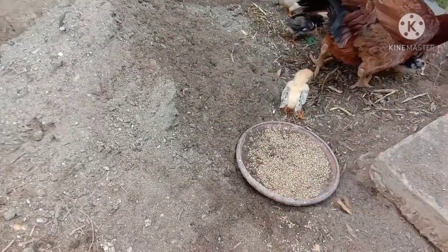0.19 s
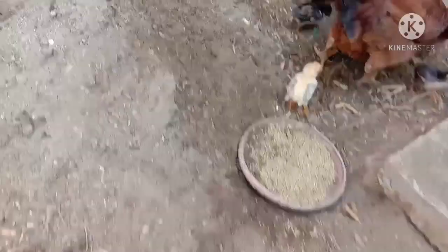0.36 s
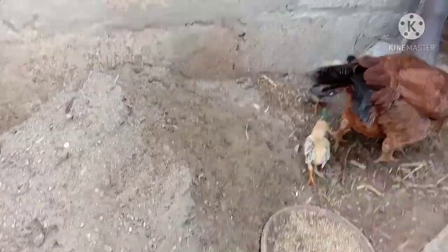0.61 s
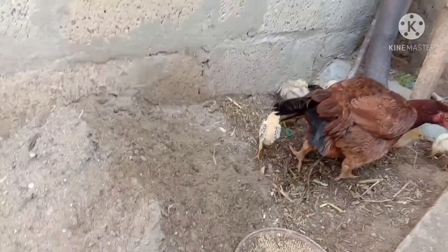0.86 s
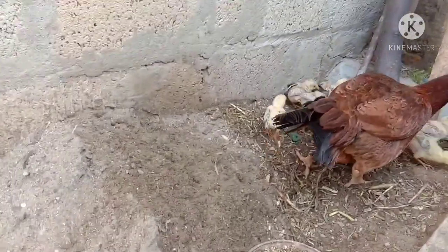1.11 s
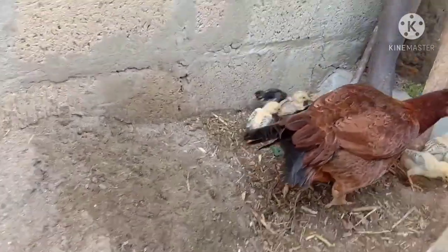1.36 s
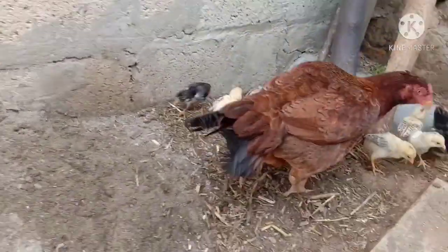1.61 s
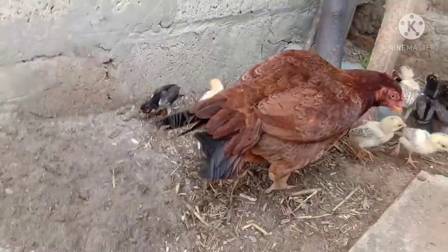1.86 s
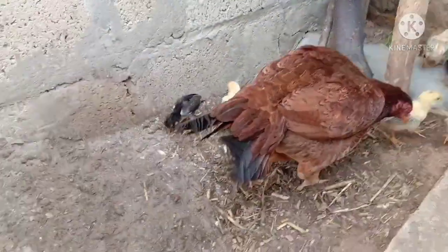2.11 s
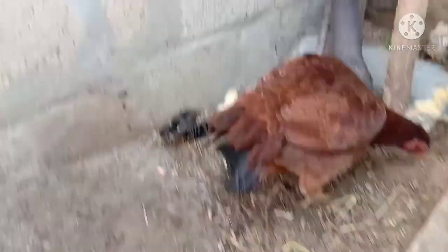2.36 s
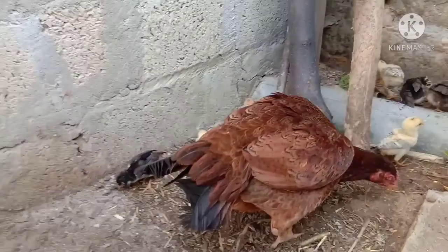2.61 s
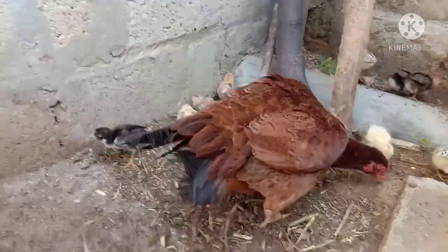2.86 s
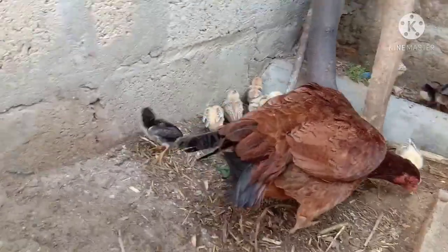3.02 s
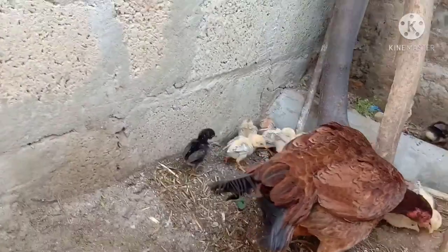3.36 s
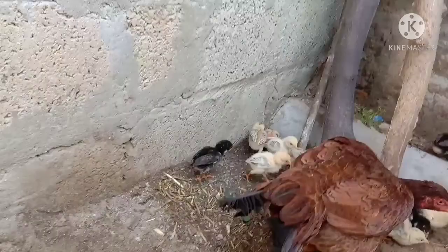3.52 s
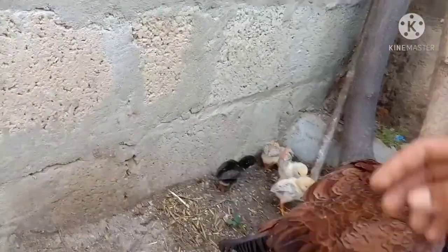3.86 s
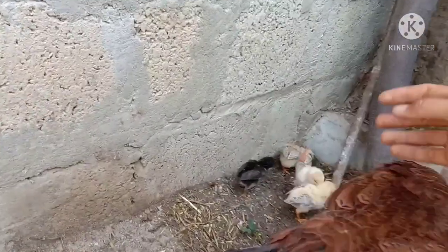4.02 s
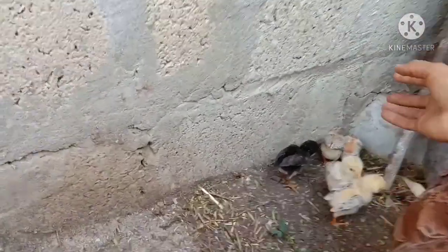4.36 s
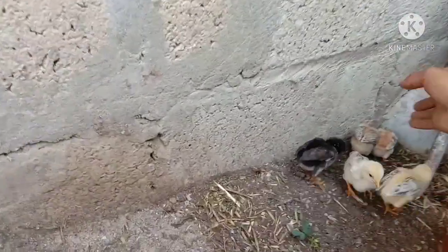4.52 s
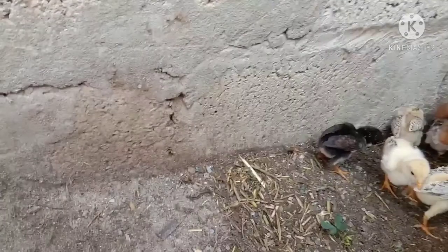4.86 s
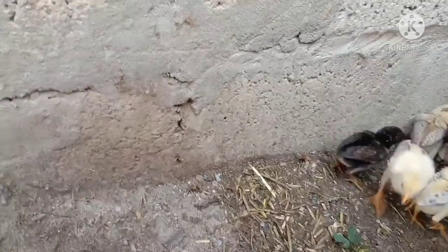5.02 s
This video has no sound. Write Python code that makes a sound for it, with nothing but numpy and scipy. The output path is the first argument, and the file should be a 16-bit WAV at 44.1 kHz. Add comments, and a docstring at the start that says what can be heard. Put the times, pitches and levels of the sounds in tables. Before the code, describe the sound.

Chicks keep up fast, high peeping over gritty footsteps and a few brief clucks, and a hen squawks once near the end.

```python
"""Chicks and a hen in a dirt yard

Chicks peep beside a block wall, each peep a short whistle that arches or slides in pitch. The hen
gives one squawk: two membranes sound at once while her fluttering throat makes a trill.
Feet scuff the grit, with short raspy clucks, low thuds and sharp ticks between. Far off, fowl call
and traffic rumbles. The wall and ground add a quick echo, and a phone close by picks it all up."""
import sys
import numpy as np
from scipy import signal
from scipy.fft import rfft, irfft
from scipy.io import wavfile
from scipy.ndimage import uniform_filter1d

SR = 44100
rng = np.random.default_rng(int(sys.argv[2]) if len(sys.argv) > 2 else 0)


def master_out(mix):
    """Clip the mix to full scale and print it as 16-bit PCM to the path in sys.argv[1]."""
    frames = np.transpose(np.atleast_2d(mix))
    ceiling = np.clip(frames, -1, 1)
    pcm = np.round(ceiling * 32767).astype(np.int16)
    wavfile.write(sys.argv[1], SR, pcm)


N = 228168

# Tone of the traffic and air: f/Hz, relative level/dB per Hz
YARD_SPECTRUM = [(30, -26), (110, -3.5), (300, -16), (700, -19), (2000, -21), (11000, -22)]
# Distant calls: start t/s, length/s, pitch f/Hz, relative level/dB of harmonics 2, 3 and 4
FOWL_CALLS = [(0.219, 0.32, 423, -59.5, -61.5, -62.5), (3.16, 0.37, 394, -89, -77, -57.5)]
# Feet on the ground: loudest t/s, rise/s, drag/s, fine grit level/dB, sole level/dB
FOOTSTEPS = [(.55, 0.0315, 0.095, -51, -69.5), (.89, 0.17, 0.043, -45, -64.5),
             (0.987, 0.013, 0.0029, -36, -49.5), (1.131, 0.222, .64, -38, -65),
             (2.219, 0.049, 0.021, -34, -46.5), (2.311, 0.069, 0.032, -43.5, -46),
             (2.441, 0.0136, 0.044, -59, -59.5), (3.127, 0.069, 0.08, -60, -60),
             (4.49, 0.28, 0.76, -48, -74.5)]
# Raspy clucks, low thuds, scuffs and sharp ticks: t/s, level/dB, rough pitch f/Hz, cycles to the peak
SHORT_SOUNDS = [(0.984, -49, 251, 1.72), (0.985, -44, 1300, 11), (1.001, -53, 73.5, 0.79),
                (1.611, -43, 837.3, 9.5), (2.3, -31.5, 1187, 15.6), (2.432, -38.5, 261.5, 0.97),
                (3.094, -31, 1113, 3), (3.149, -33.5, 978, 13.2), (3.174, -38.5, 1790, 5.9),
                (4.021, -36.5, 755, 3.8), (3.135, -35, 9600, 3.6), (4.976, -34, 1927, 1)]
# The hen's two voices: t/s, upper f/Hz, its relative level/dB, lower f/Hz, its relative level/dB
HEN_VOICES = [(4.515, 1650, -54.5, 1400, -85), (4.585, 1830, -21, 1400, -39), (4.6, 1855, -39, 1413, -9.5),
              (4.625, 1808, -30, 1391, -37), (4.655, 1900, -27.5, 1506, -23.5),
              (4.69, 1530, -21.5, 1330, -20.5), (4.74, 1445, -24.5, 1211, -19),
              (4.83, 1368, -29, 1205, -19), (4.875, 1309, -23, 1045, -37), (4.89, 1290, -49, 910, -33),
              (4.925, 1177, -57, 840, -106.5)]
# Nearest chicks: start t/s, length/s, top f/Hz, fall to the end/Hz, top's share of length, level/dB
# A share below 0 means the peep only slides down; a negative fall makes it scoop up.
NEAR_PEEPS = [(0.041, 0.039, 4130, 1172, -0.31, -39), (0.118, 0.057, 4180, 1000, -0.19, -42),
              (0.218, 0.041, 4025, 313, -0.05, -34), (0.219, 0.047, 2539, 85, -0.24, -39.5),
              (0.37, 0.048, 4400, 1091, 0.33, -45), (0.422, 0.051, 4180, 1114, 0.5, -40),
              (0.509, 0.07, 4236, 700, -0.021, -43), (0.618, 0.0647, 3560, 568, 0.065, -39.5),
              (0.648, 0.036, 4700, 309, 0.61, -41.5), (0.741, 0.06, 3765, 498, 0.6, -40.5),
              (0.811, 0.055, 4330, 1006, 0.31, -38.5), (0.867, 0.052, 4010, 1053, -0.36, -36),
              (0.916, 0.025, 4420, 298, 0.45, -40.5), (1.023, 0.051, 3650, 948, 0.25, -43),
              (1.107, 0.065, 3924, 699, 0.21, -40.5), (1.167, 0.051, 4140, 997, 0.127, -38.5),
              (1.221, 0.044, 4401, 895, 0.26, -34), (1.313, 0.062, 4343, 1310, 0.12, -36),
              (1.386, 0.077, 4434, 1400, 0.12, -38.5), (1.443, 0.04, 4240, 1200, 0.42, -37),
              (1.503, 0.19, 5076, 600, -0.046, -41), (1.526, 0.042, 3860, 400, 0.45, -34),
              (1.63, 0.048, 3870, 1298, 0.21, -37.5), (1.72, 0.065, 4718, 2104, 0.31, -37.5),
              (1.799, 0.055, 4310, 1193, -0.47, -35.5), (1.856, 0.055, 3870, 898, 0.37, -36),
              (1.92, 0.066, 4610, 1592, -0.012, -35.5), (2.032, 0.04, 4350, 899, 0.2, -33),
              (2.12, 0.066, 3760, 801, 0.545, -38), (2.163, 0.053, 4630, 1303, 0.557, -36.5),
              (2.308, 0.065, 4850, 896, 0.44, -39), (2.412, 0.029, 4040, 1192, -0.42, -36.5),
              (2.454, 0.04, 4260, 1300, 0.24, -42.5), (2.503, 0.054, 4250, 1600, 0.13, -37.5),
              (2.537, 0.05, 4430, 498, 0.58, -39.5), (2.624, 0.069, 4200, 1295, 0.32, -38.5),
              (2.64, 0.07, 5014, 452, 0.44, -41.5), (2.705, 0.077, 2740, -1700, 0.57, -40.5),
              (2.815, 0.039, 3980, 794, -0.15, -40), (2.802, 0.042, 2558, -250, 0.72, -39),
              (2.914, 0.046, 4120, 706, 0.53, -34.5), (2.948, 0.06, 4350, 1000, -0.47, -38),
              (3.085, 0.033, 4060, 903, 0.34, -38), (3.132, 0.074, 5070, 1203, 0.5, -46),
              (3.251, 0.038, 4500, 1794, -0.19, -37.5), (3.32, 0.046, 3620, 593, -0.37, -38),
              (3.326, 0.037, 4160, 504, 0.35, -38), (3.406, 0.056, 3970, 1007, 0.44, -33),
              (3.444, 0.036, 4160, 1597, -0.15, -37), (3.452, 0.032, 3860, 407, 0.11, -47),
              (3.514, 0.029, 3775, 204, 0.67, -33), (3.515, 0.038, 4396, 1703, 0.64, -37),
              (3.614, 0.038, 4000, 499, 0.64, -35), (3.697, 0.051, 4320, 1450, 0.18, -42),
              (3.711, 0.063, 4950, 520, 0.46, -39), (3.764, 0.042, 4155, 486, 0.043, -30),
              (3.865, 0.067, 4550, 897, -0.34, -35), (3.939, 0.069, 4860, 1736, -0.74, -35.5),
              (4.013, 0.053, 3990, 573, -0.63, -36), (4.029, 0.062, 4280, 1056, 0.3, -34),
              (4.123, 0.05, 4130, 1195, 0.58, -32), (4.197, 0.033, 4200, 1607, 0.16, -35.5),
              (4.249, 0.038, 4065, 523, 0.6, -32.5), (4.314, 0.032, 4020, 129, 0.48, -31.5),
              (4.372, 0.034, 3880, 507, -0.043, -32), (4.41, 0.025, 4020, 894, -0.3, -28.5),
              (4.509, 0.043, 4410, 1006, -0.35, -31.5), (4.53, 0.032, 3690, 622, 0.59, -32),
              (4.803, 0.061, 4360, 1297.5, 0.25, -34.5), (4.902, 0.045, 3950, 895, 0.057, -32.5),
              (4.922, 0.052, 4551, 1296, -0.7, -26), (5.005, 0.018, 4500, 600, 0.37, -32),
              (5.03, 0.03, 2964, 898.5, -0.19, -35), (5.036, 0.062, 3780, 1702, 0.23, -36.5),
              (5.043, 0.036, 4286, 1301, 0.35, -24.5), (5.048, 0.044, 4890, 304, 0.4, -37),
              (5.14, 0.039, 4140, 801.5, -0.64, -24)]
# One chick's three quick arches: start t/s, spacing/s, top f/Hz, fall/Hz, level/dB
CHICK_WARBLE = (5.103, 0.0205, 5130, 600, -35)

FLOCK_TOP_HZ, FLOCK_SPREAD_HZ, FLOCK_END_HZ, FLOCK_PEEP_S = 3998, 330, 2931, 0.059  # farther chicks


def undb(db):
    """Turn decibels into a gain."""
    return 10 ** (np.asarray(db) / 20)


def band(x, lo_hz, hi_hz):
    """Keep one band of frequencies, scaled to a typical size (rms) of 1."""
    y = signal.sosfilt(signal.butter(2, [lo_hz, hi_hz], "bandpass", fs=SR, output="sos"), x)
    return y / np.std(y)


def colour(x, points):
    """Shape the tone with a curve through (f/Hz, level/dB) points."""
    hz, db = np.transpose(points)
    f = np.maximum(np.arange(N // 2 + 1) * SR / N, 1)
    return irfft(rfft(x) * undb(np.interp(np.log(f), np.log(hz), db)), N)


def wander(per_s):
    """A smooth random wobble of typical size 1, with per_s new values a second."""
    hold = int(SR / per_s)
    stairs = np.repeat(rng.standard_normal(N // hold + 1), hold)
    y = uniform_filter1d(uniform_filter1d(stairs, hold), hold)[:N]
    return y / np.std(y)


def add(out, start_s, x):
    """Mix x into out from start_s on."""
    i = int(np.clip(start_s * SR, 0, N - 1))
    out[i:i + len(x)] += x[:N - i]


def traffic_and_air(level_db=-63.5):
    """Distant traffic rumble and air: half-octave bands of noise, each flickering on its own."""
    out = np.zeros(N)
    freqs, levels = np.transpose(YARD_SPECTRUM)
    for hz in 30 * 2 ** np.arange(0, 8.6, .5):
        db = np.interp(np.log(hz), np.log(freqs), levels) + 10 * np.log10(hz) + 3 * wander(4.75)
        out += undb(db) * band(rng.standard_normal(N), hz * .84, hz * 1.19)
    return out / np.std(out) * undb(level_db)


def far_fowl():
    """Faint drawn-out calls, blurred by distance into narrow bands of noise."""
    out = np.zeros(N)
    for start, length, hz, *levels in FOWL_CALLS:
        progress = np.arange(int(length * SR)) / (length * SR)
        for k, db in enumerate(levels, 2):
            blur = band(rng.standard_normal(len(progress)), k * hz * .95, k * hz * 1.05)
            add(out, start, undb(db - 3) * np.sin(np.pi * progress) ** .5 * blur)
    return out


def grit(scatter_db, share):
    """Many small grains: noise in which a share of the samples are clicks of very mixed size."""
    noise = rng.standard_normal(N)
    is_click = rng.random(N) < share
    return noise * (1 + is_click * undb(scatter_db * np.minimum(rng.exponential(size=N), 3)))


def foot_pressure(levels, rise_db=14.5, sag_db_per_s=18, lift_s=0.053):
    """How hard the feet press: each step swells, sags while dragged and lifts off."""
    out, t = np.zeros(N), np.arange(N) / SR
    for (peak, rise, drag, *_), db in zip(FOOTSTEPS, levels):
        lift, sag = peak + drag, -sag_db_per_s * drag
        times = [peak - 2 * rise, peak - rise, peak, lift, lift + lift_s, lift + 2 * lift_s]
        out += undb(db + np.interp(t, times, [-60, -rise_db, 0, sag, sag - rise_db, -60]))
    return out


def feet():
    """Fine grit hisses high; a dragged sole grinds lower, and broader the harder it presses."""
    *_, grit_db, sole_db = np.transpose(FOOTSTEPS)
    fine = colour(grit(4.9, 0.056), [(1200, -47.5), (3000, -5.5), (5000, 5), (15000, -3)])
    coarse = grit(3.5, 0.027)
    broad = colour(coarse, [(250, -12.5), (900, 4), (2500, 8.5), (7000, 2.5), (12000, -54)])
    drag = foot_pressure(sole_db) * undb(2.2 * wander(90))
    hiss = fine / np.std(fine) * foot_pressure(grit_db) * undb(2.14 * wander(40.29))
    grind = band(coarse, 1000, 2286) * drag
    scrape = broad / np.std(broad) * undb(27.5) * drag ** 1.346
    return hiss + grind + scrape


def clucks_thuds_and_ticks():
    """Each cluck, thud, scuff or tick is a brief raspy tone that swells, sinks in pitch and dies."""
    out, t = np.zeros(N), np.arange(int(.15 * SR)) / SR
    for start, db, hz, cycles in SHORT_SOUNDS:
        age = t * hz / cycles  # 1 at the peak
        swell = (age * np.exp(1 - age)) ** 2
        ring = np.sin(2 * np.pi * np.cumsum(hz * (0.9 + 0.22 * np.exp(-age))) / SR)
        rasp = 1 + 1.65 * uniform_filter1d(rng.standard_normal(len(t)), size=40)
        add(out, start, undb(db) * swell * ring * rasp)
    return out


def wall_echo(x):
    """The wall and ground throw back a quick cloud of echoes with a faint longer tail."""
    t = np.arange(int(.3 * SR)) / SR
    fade = np.exp(-t / 0.0054) + 0.055 * np.exp(-t / 0.027)
    echo = rng.standard_normal(len(t)) * (t > .002) * fade
    return signal.fftconvolve(x, echo / np.sqrt(np.sum(echo ** 2)))[:N]


def peep(length, top_hz, fall_hz, top_at, db, octave_db, breath_db):
    """An arching whistle with a weaker octave; unsteady breath shakes its pitch and level."""
    attack_s, max_climb_hz, shake_hz_per_db = 0.0044, 1100, 18
    n = int(length * SR)
    progress = np.arange(n) / (length * SR)
    drop_hz = fall_hz * ((progress - top_at) / (1 - top_at)) ** 2
    drop_hz = np.where(progress < top_at, max_climb_hz * np.tanh(drop_hz / max_climb_hz), drop_hz)
    hz = top_hz - drop_hz + shake_hz_per_db * breath_db[n:2 * n]
    phase = 2 * np.pi * np.cumsum(hz) / SR
    swell = np.tanh(progress * length / attack_s) ** 2 * (1 - progress ** 12.8) ** 0.5
    return swell * undb(db + breath_db[:n]) * (np.sin(phase) + undb(octave_db) * np.sin(2 * phase))


def hidden_chicks(peeps_per_s=45, alarm_s=3.78):
    """Steady twitter; from alarm_s on, as a hand comes near, it is louder and wider in pitch."""
    out, steady_breath = np.zeros(N), np.zeros(N // 10)
    for k, (lag, pitch, loud) in enumerate(rng.standard_normal((int(peeps_per_s * N / SR), 3))):
        start = (k + lag) / peeps_per_s
        spread_hz, db = (850, -41) if start > alarm_s else (FLOCK_SPREAD_HZ, -52.5)
        top_hz = FLOCK_TOP_HZ + spread_hz * pitch
        fall_hz = top_hz - FLOCK_END_HZ
        add(out, start, peep(FLOCK_PEEP_S, top_hz, fall_hz, 0.2793, db + 4 * loud, -10.5, steady_breath))
    return out


def hen(trill_hz=59.95, puff_peak_s=4.7275):
    """Two membranes sing; the throat's flutter chops the lower voice into puffs and shakes the upper."""
    t = np.arange(N) / SR
    times, *columns = np.transpose(HEN_VOICES)
    upper_hz, upper_db, lower_hz, lower_db = [np.interp(t, times, c, -120, -120) for c in columns]
    flutter = 2 * np.pi * trill_hz * (t - puff_peak_s)
    puff = np.exp(2.86 * (np.cos(flutter) - 1))
    upper_hz *= 1 - 0.03 * np.cos(flutter) + 0.011 * wander(300)
    lower_hz *= 1 + 0.025 * wander(300)
    upper_phase, lower_phase = 2 * np.pi * np.cumsum([upper_hz, lower_hz], axis=1) / SR
    upper_gain = undb(upper_db + 3 + 1.5 * wander(250)) * (1 + .6 * np.cos(flutter + 2.5))
    lower_gain = undb(lower_db + 9) * puff
    voice = upper_gain * np.sin(upper_phase) + lower_gain * np.sin(lower_phase)
    # The membranes slap shut unevenly, adding rough harmonics 2 to 6.
    for k, db in enumerate([-7, -11, -15, -21, -25], 2):
        rasp = upper_gain * (0.4 + puff) * np.sin(k * upper_phase)
        rasp += 0.2 * lower_gain * np.sin(k * lower_phase)
        voice += undb(db + 2.5 * wander(300)) * rasp
    air = undb(-25) * upper_gain * band(rng.standard_normal(N), 2300, 6200)  # follows her effort
    return voice + air


def near_chicks():
    """Close peeps, each answered by two softer ones from behind the hen, and one short warble."""
    out, breath_db = np.zeros(N), 1.89 * wander(140)
    for start, *shape, db in NEAR_PEEPS:
        breath = breath_db[int(start * SR * .8):]  # each peep gets its own stretch of wobble
        octave_db = -16 + 0.15 * (db + 31.5) + 3 * rng.standard_normal()  # louder is brighter
        add(out, start, peep(*shape, db, octave_db, breath))
        for lag, pitch, arch, loud in rng.standard_normal((2, 4)):
            top_hz = FLOCK_TOP_HZ + FLOCK_SPREAD_HZ * pitch
            top_at = np.clip(0.33 + 0.1501 * arch, -.4, .45)
            reply_db = min(db, -33) - 9 + 3 * loud
            reply = peep(FLOCK_PEEP_S, top_hz, top_hz - FLOCK_END_HZ, top_at, reply_db, -12.5, breath[::2])
            add(out, start + .026 * abs(lag), reply)
    start, spacing, top_hz, fall_hz, db = CHICK_WARBLE
    for k in range(3):
        add(out, start + k * spacing, peep(spacing, top_hz, fall_hz, 0.76, db, -7.5, breath_db))
    return out


def scene():
    """Mix the yard in one channel; the hidden chicks are heard only as echoes."""
    nearby, squawk = near_chicks() + clucks_thuds_and_ticks(), hen()
    echo = undb(-7.5) * wall_echo(nearby + hidden_chicks() + 1.4 * squawk)
    return (nearby + squawk + echo + feet() + far_fowl() + traffic_and_air())[None]


def record(dry, cutoff_hz=15400):
    """The phone's microphone is bright near 7 kHz, duller above, and cuts the top steeply."""
    heard = colour(dry, [(5900, 0), (7000, 3), (8200, -8), (9200, -4.5), (15000, -12.5)])
    return signal.sosfilt(signal.ellip(10, .2, 80, cutoff_hz, fs=SR, output="sos"), heard)


dry = scene()
out = record(dry)
master_out(out)
```